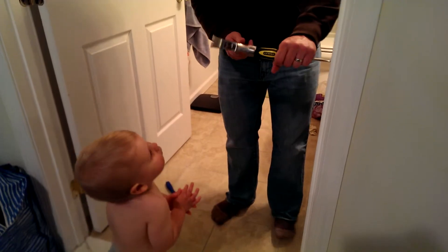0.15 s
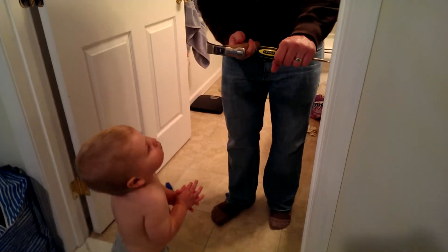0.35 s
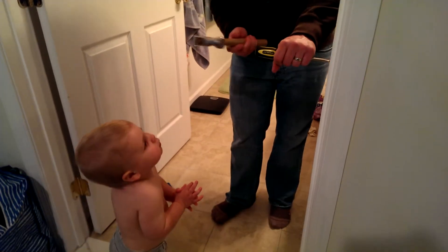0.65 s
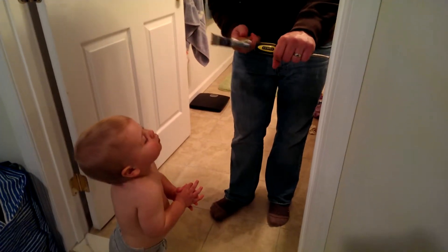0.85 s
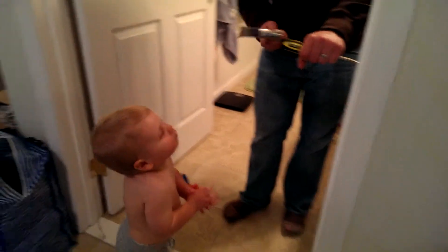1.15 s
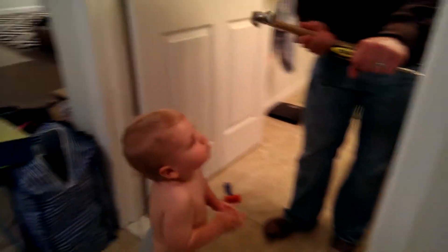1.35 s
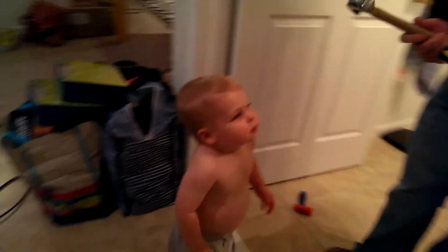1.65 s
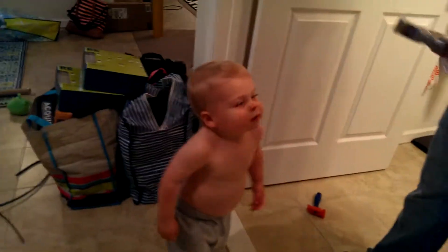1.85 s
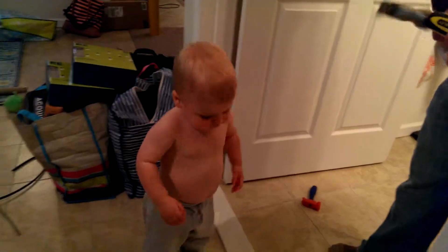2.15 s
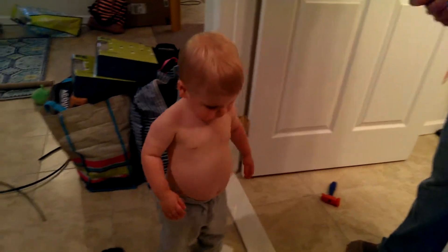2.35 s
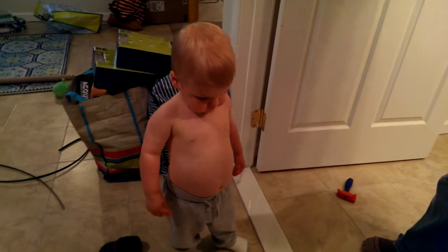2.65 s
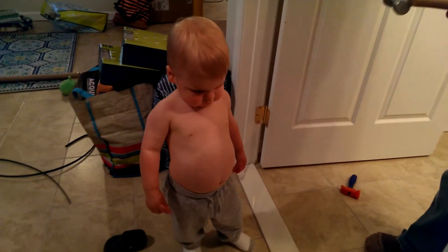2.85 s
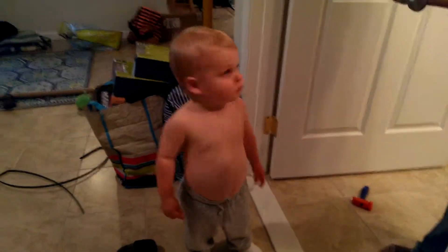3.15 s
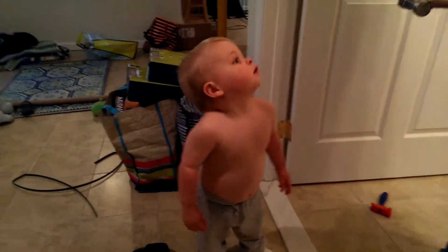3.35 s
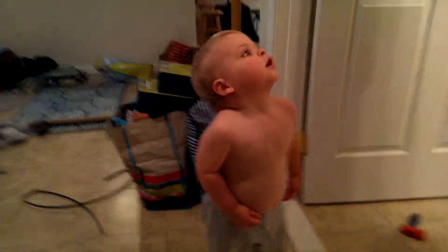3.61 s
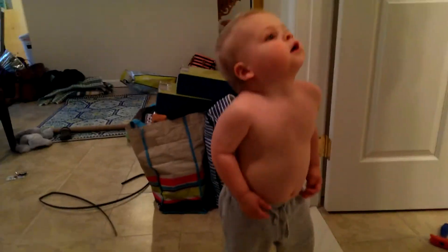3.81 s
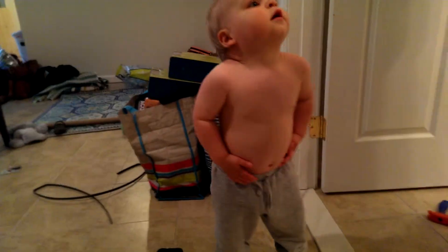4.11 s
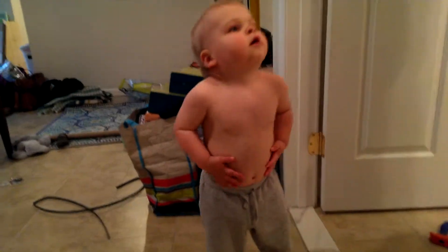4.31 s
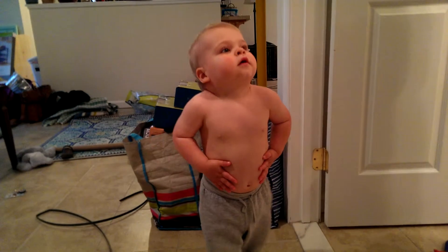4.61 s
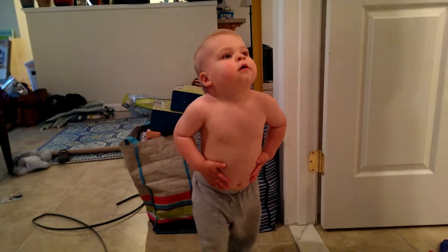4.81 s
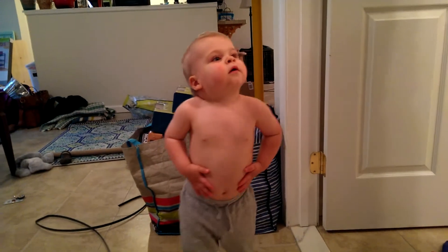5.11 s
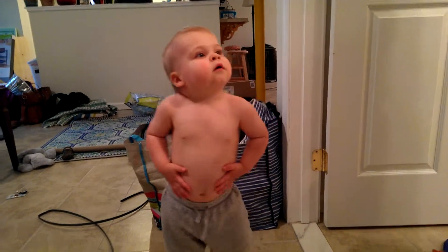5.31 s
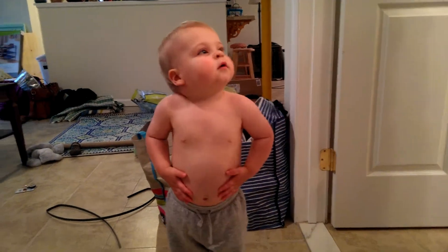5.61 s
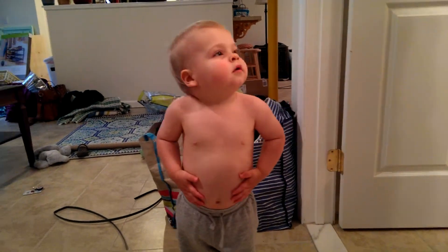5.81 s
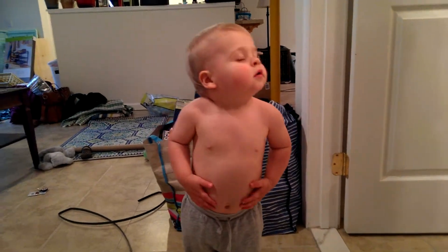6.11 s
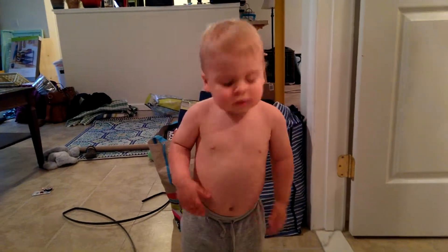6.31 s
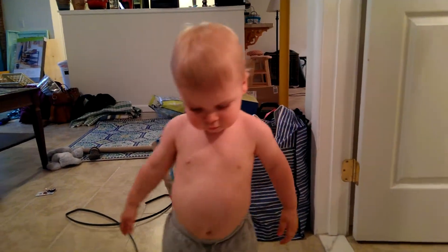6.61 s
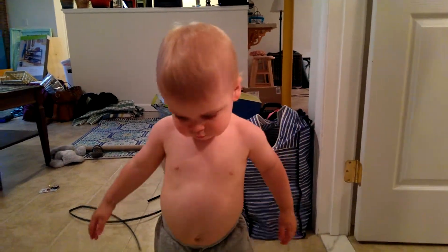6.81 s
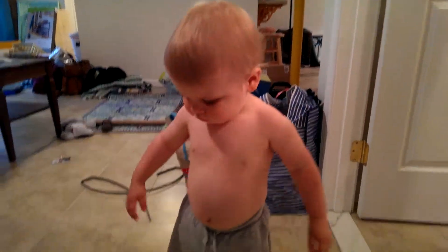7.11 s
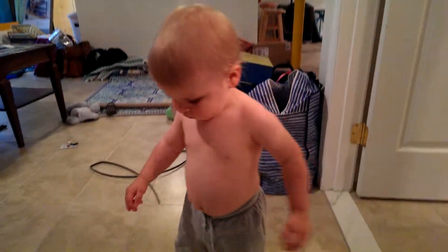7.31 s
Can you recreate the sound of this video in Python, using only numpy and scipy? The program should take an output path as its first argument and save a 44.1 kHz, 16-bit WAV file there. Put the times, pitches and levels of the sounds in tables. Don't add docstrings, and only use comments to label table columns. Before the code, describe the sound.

A hammer drives two runs of seven quick even blows into a wooden door frame, with a quiet pause of rustling cloth between in a bare room.

```python
import sys
import numpy as np
from scipy import signal
from scipy.io import wavfile

SR = 44100
rng = np.random.default_rng(int(sys.argv[2]) if len(sys.argv) > 2 else 0)


def to_linear_factor(level_db):
    exponent = np.asarray(level_db, float) / 20
    return 10 ** exponent


def log_audio(samples):
    frames = np.atleast_2d(samples).T
    limited = np.clip(frames, -1, 1)
    pcm = np.round(limited * 32767).astype(np.int16)
    wavfile.write(sys.argv[1], SR, pcm)


N = 328986
EDGES_HZ = 20 * 2 ** np.arange(0, 9.8, 1 / 3)
RUNS_PART_S = 5.2


def rms_one(x):
    return x / np.sqrt(np.mean(x ** 2) + 1e-20)


def at_hz(points, hz):
    points_hz, values = np.transpose(points)
    return np.interp(np.log(hz), np.log(points_hz), values)


def ring(clicks, hz, t60):
    radius = to_linear_factor(-60 / (t60 * SR))
    angle = 2 * np.pi * hz / SR
    feedback = [1, -2 * radius * np.cos(angle), radius * radius]
    return signal.lfilter([0, np.sin(angle)], feedback, clicks + 1e-18)


def third_octaves(white, gain_of_band, from_hz):
    # f/Hz, left over right/dB
    port_balance = [(60, 6.5), (95, -1.5), (150, 4), (240, -3), (380, -0.5), (600, 0), (950, 0.5),
                    (1500, -1.5), (2380, -2.5), (3770, -11.5), (5980, 2.5), (9470, 37), (15000, 18.5)]
    # f/Hz, correlation/1
    likeness = [(60, -0.34), (150, 0.94), (380, 0.74), (950, 0.28), (2380, -0.28), (5980, 0.14),
                (15000, 0.49)]
    out, edges = 0, EDGES_HZ[EDGES_HZ > from_hz]
    for k, (low, high) in enumerate(zip(edges, edges[1:])):
        hz = np.sqrt(low * high)
        sos = signal.butter(2, [low, high], "band", fs=SR, output="sos")
        mid, side = signal.sosfilt(sos, white[k % 2] * gain_of_band(hz) + 1e-18)
        alike = np.clip(at_hz(likeness, hz), -1, 1)
        port = to_linear_factor(at_hz(port_balance, hz) / 2)
        mid, side = np.sqrt(1 + alike) * mid, np.sqrt(1 - alike) * side
        pair = np.array([(mid + side) * port, (mid - side) / port])
        out = out + pair / np.sqrt(port ** 2 + port ** -2)
    return out


def hits():
    # t/s, peak level/dB, wall boom/dB, hardness (treble over mid)/dB
    hammer_blows = [(0.574, -15.5, -27.5, -30.5), (0.908, -1.5, -17.5, -27.5), (1.2336, -0.5, -13, -22.5),
                    (1.5734, 1.5, -12.5, -23), (1.91, 2, -10.5, -16.5), (2.2464, 2, -15, -12),
                    (2.5846, -5, -10, -6), (5.414, -5.5, -15, -28.5), (5.7457, -0.5, -13.5, -24),
                    (6.0722, 1.5, -10, -21.5), (6.3888, 2.5, -8.5, -18), (6.7215, 3, -11.5, -21),
                    (7.053, 3, -10, -17), (7.385, 4, -8, -19)]
    # t/s, peak level/dB, wall boom/dB, hardness/dB, body over mid/dB
    soft_bumps = [
        (0.198, -38, -43, -31, -16),
        (0.264, -44, -46.5, -36, -3),
        (3.795, -52, -46.5, -18, -5),
        (3.83, -48.5, -58, -8, -23),
        (4.778, -57, -69, -36, 1),
    ]
    first_body_db, second_body_db = -12, -15
    s, peak_db, boom_db, hard_db = np.transpose(hammer_blows)
    longer = 0.93 + 0.022 * np.minimum(hard_db + 20, 0)
    blow_body_db = np.where(s < RUNS_PART_S, first_body_db, second_body_db)
    blows = [s, peak_db, boom_db, hard_db, longer, blow_body_db]
    *bumps, body_db = np.transpose(soft_bumps)
    bumps += [0.57 - 0.015 * (body_db - first_body_db), body_db]
    both = np.hstack([blows, bumps])
    return both[:, np.argsort(both[0])]


def shudder():
    peak_s, rise_s, fall_db_per_s = 0.21, 0.06, 92.5
    s, _, boom_db = hits()[:3]
    late = np.arange(SR) / SR - peak_s
    shape = np.where(late < 0, np.exp(-(late / rise_s) ** 2 / 2), to_linear_factor(-fall_db_per_s * late))
    gain = np.full(N + SR, to_linear_factor(-72.5))
    for i, g in zip((s * SR).astype(int), to_linear_factor(-11 + 1.3 * boom_db)):
        gain[i:i + SR] += g * shape
    return gain[:N]


def house():
    # f/Hz, level/dB
    room_tone = [(12, -31), (20, -2), (49, 2.5), (96, -24.5), (189, -16), (404, -20), (465, -17.5),
                 (506, -28), (772, -16), (939, -18.5), (3940, -20), (7300, -39), (11100, -27.5),
                 (16500, -54.5)]
    # f/Hz, rms level/dB
    appliance_lines = [(241, -87), (475, -91), (752, -89), (791, -88.5)]
    white = rng.standard_normal((2, 2, N))
    tone = to_linear_factor(-68) * rms_one(third_octaves(white, lambda hz: to_linear_factor(at_hz(room_tone, hz)), from_hz=30))
    low_band = signal.butter(2, [34, 100], "band", fs=SR, output="sos")
    low = signal.sosfilt(low_band, white[0, :, ::-1])
    low = rms_one(low[0] + 0.22 * low[1] * [[1], [-1]])
    lines = sum(to_linear_factor(db) * rms_one(ring(white[1, 0, ::-1], hz, 1.0)) for hz, db in appliance_lines)
    return tone + lines + to_linear_factor(-12) * low * shudder()


def steel_snap(level_db=13, edge_hz=3500, right_cut_hz=5000):
    s, peak_db, _, hard_db = hits()[:4]
    clicks = np.zeros(N)
    clicks[(s * SR).astype(int)] = -to_linear_factor(peak_db + hard_db + level_db)
    snap = signal.sosfilt(signal.butter(2, edge_hz, "high", fs=SR, output="sos"), clicks + 1e-18)
    return np.array([snap, signal.sosfilt(signal.butter(2, right_cut_hz, fs=SR, output="sos"), snap)])


def blows_in_room(same=0.4, level_db=10.5, treble_from_hz=1500):
    # f/Hz, density/dB per Hz
    tail_colour = [(59, -29.5), (100, -4), (111, -7.5), (174, -6), (207, -6.5), (384, -5.5), (518, -8.5),
                   (602, -13.5), (699, -10.5), (1990, -11.5), (4120, -16.5), (6730, -37), (11200, -28),
                   (16500, -65)]
    # f/Hz, t60/s
    tail_t60 = [(100, 0.82), (300, 0.68), (1000, 0.7), (3000, 0.7), (6000, 0.74), (12000, 0.47)]
    usual_hardness_db, usual_body_db = -14.5, -9
    s, peak_db, _, hard_db, longer, body_db = hits()
    harder_db = hard_db - usual_hardness_db
    last = np.clip(np.searchsorted(s, np.arange(N) / SR) - 1, 0, None)
    since_blow = np.abs(np.arange(N) - s[last] * SR).astype(int)
    pattern = rng.standard_normal((2, 2, N))[..., since_blow]
    white = np.sqrt(same) * pattern + np.sqrt(1 - same) * rng.standard_normal((2, 2, N))
    starts, age = ((s - 0.0003) * SR).astype(int), np.arange(SR // 2) / SR
    gather = 1 - np.exp(-age / 0.00072)
    early = to_linear_factor(2.0) * np.exp(-age / 0.021)
    tick = to_linear_factor(14) * (1 - np.exp(-age / 0.00019)) * np.exp(-age / 0.00052)
    chatter = to_linear_factor(14) * gather * np.exp(-age / 0.003)
    far = to_linear_factor(-9.5) * np.exp(-((age - 0.065) / 0.031) ** 2 / 2)
    sag = np.exp(-(age / 0.27) ** 2 / 2)

    def bump_at(hz, centre_hz, octaves):
        return np.exp(-(np.log2(hz / centre_hz) / octaves) ** 2)

    def dying(hz):
        t60, gain = at_hz(tail_t60, hz), np.zeros(N + SR)
        treble = np.clip(np.log2(hz / treble_from_hz) / 3.77, 0, 1.2)
        bass = np.clip(np.log2(900 / hz), 0, 1)
        soft = 0.34 * bump_at(hz, 1274, 0.19)
        colour_db = (treble - soft) * harder_db + bass * (body_db - usual_body_db)
        woken = bump_at(hz, np.where(s < RUNS_PART_S, 4018, 2016), 0.17)
        colour_db = colour_db + 0.5 * woken * np.clip(hard_db + 31, 0, 8.0)
        crack = gather * (1 + far + early * to_linear_factor(1.5 * treble))
        contact = (0.12 + treble) * tick + treble ** 5.8 * chatter
        shape = sag ** (1 - 0.5 * treble) * (crack + contact)
        lasting = longer ** np.clip(1 - 0.2 * treble, 0, 1) * to_linear_factor(-0.3 * soft * harder_db)
        heights = to_linear_factor(peak_db + colour_db + at_hz(tail_colour, hz) + level_db)
        for i, g, more in zip(starts, heights, lasting):
            gain[i:i + len(age)] += g * shape * np.exp(-np.log(1000) * age / (t60 * max(more, 0.2)))
        return gain[:N]
    return third_octaves(white, dying, from_hz=60)


def struck_modes(modes, strength_db, contact_hz, spread_db, pan_db):
    at, out = (hits()[0] * SR).astype(int), np.zeros((2, N))
    luck = rng.standard_normal((len(at), len(modes)))
    for k, (hz, level_db, t60) in enumerate(modes):
        clicks = np.zeros(N)
        clicks[at] = to_linear_factor(strength_db + level_db + spread_db * luck[:, k])
        side = pan_db * (-1) ** (k // 2) * np.array([[1], [-1]])
        out += (-1) ** k * ring(clicks, hz, t60) * to_linear_factor(side)
    return signal.sosfilt(signal.butter(2, contact_hz, fs=SR, output="sos"), out)


def wall_boom():
    # f/Hz, level/dB, t60/s
    wall_modes = [(42.43, -15, 0.96), (48.5, -24, 0.69), (55.7, -23, 0.42), (84.9, 1.5, 0.26),
                  (77.23, 4, 0.27), (80.8, -14, 0.61), (124.9, -15.5, 0.39), (179.7, -21, 0.59),
                  (381.3, -19, 0.38), (457, -21.5, 0.23)]
    boom_db = hits()[2]
    wall = struck_modes(wall_modes, boom_db + 9.5, contact_hz=517, spread_db=2.5, pan_db=0.17)
    return np.pad(wall, ((0, 0), (130, 0)))[:, :N]


def frame_ring():
    # f/Hz, level/dB, t60/s
    frame_modes = [(587, -19.5, 0.18), (712, -22, 0.12), (963, -20, 0.077), (1156, -16, 0.16),
                   (1290, -18.5, 0.27), (1385, -21.5, 0.31), (1564, -26, 0.18), (1670, -20.5, 0.2),
                   (1967, -20, 0.11), (2300, -21, 0.24)]
    # f/Hz, level/dB, t60/s
    soft_modes = [(1246, -19, .3), (1310, -20, 0.46), (1356, -17.5, 0.55), (1413, -18, .35),
                  (1490, -19.5, .3), (1570, -21, .25)]
    _, peak_db, _, hard_db = hits()[:4]
    frame = struck_modes(frame_modes, peak_db + 3, contact_hz=4000, spread_db=3.0, pan_db=2.5)
    softer_db = 0.45 * (hard_db.min() - hard_db) - 20 * (peak_db < -30)
    soft_db = peak_db + softer_db + 4.0
    return frame + struck_modes(soft_modes, soft_db, contact_hz=4000, spread_db=2.0, pan_db=2.0)


def rubbing():
    # peak t/s, peak level/dB, rise/s, fall/s
    rubs = [(0.28, -75, 0.058, 0.095), (0.415, -71, 0.023, .03), (1.12, -68.5, .015, .025),
            (1.186, -58.5, 0.017, 0.02343), (2.97, -71.5, .01, 0.069), (3.16, -67.5, 0.0081, 0.066),
            (3.41, -69.5, .006, .09), (3.488, -67, 0.0065, 0.011), (3.601, -70.5, .05, 0.19),
            (3.686, -67.5, .006, .02), (3.816, -66.5, 0.011, 0.024), (3.86, -69.5, 0.083, 0.17),
            (4.888, -78, 0.036, .06)]
    t, gain = np.arange(N) / SR, 0
    for s, db, rise_s, fall_s in rubs:
        gain = gain + to_linear_factor(db) * np.exp(-((t - s) / np.where(t > s, fall_s, rise_s)) ** 2 / 2)
    return gain


def rustle(grains_per_s=9000, size_db=1.0, level_db=5):
    # f/Hz, density/dB per Hz
    cloth_colour = [(240, -40), (400, -7), (481, -6.5), (1510, -7), (1710, -6), (3930, -1), (5520, -8),
                    (6950, -15.5), (11400, -5.5), (16000, -16.5)]
    shape = (2, N)
    caught = rng.random(shape) < grains_per_s / SR
    grains = caught * to_linear_factor(size_db * rng.exponential(1, shape)) * rng.standard_normal(shape)
    swish = third_octaves([grains, grains[:, ::-1]], lambda hz: to_linear_factor(at_hz(cloth_colour, hz)), from_hz=300)
    return to_linear_factor(level_db) * rms_one(swish) * rubbing()


def door_panel():
    # f/Hz, level/dB, t60/s
    panel_modes = [(261.3, -27, 1.4)]
    s, _, boom_db = hits()[:3]
    strength_db = boom_db + 8 - 40 * (s < 5.6)
    return struck_modes(panel_modes, strength_db, contact_hz=503, spread_db=-4.0, pan_db=-0.5)


def scene():
    left_lag = 8
    left, right = wall_boom() + door_panel() + frame_ring()
    wood = np.array([np.pad(left, (left_lag, 0))[:N], right])
    return house() + steel_snap() + blows_in_room() + wood + rustle()


def low_pass(x):
    return signal.sosfilt(signal.butter(12, 16740, fs=SR, output="sos"), x)


def record(dry):
    level_db = 20 * np.log10(np.abs(dry).max(axis=0) + 1e-9)
    slope = 150 * np.arange(N) / SR
    held_db = np.maximum.accumulate(level_db + slope) - slope
    cut_db = -0.4 * np.clip(held_db + 8.5, 0, None)
    smooth = np.exp(-1 / (0.0027 * SR))
    gain_db = 1.5 + signal.lfilter([1 - smooth], [1, -smooth], cut_db)
    ports = signal.sosfilt(signal.butter(2, 33, "high", fs=SR, output="sos"), dry)
    ports = ports - 0.42 * signal.lfilter(*signal.iirpeak(6717, 6717 / 860, SR), ports)
    ports = ports + 0.72 * signal.lfilter(*signal.iirpeak(11460, 11460 / 1200, SR), ports)
    rounded = 0.88 * np.tanh(ports * to_linear_factor(gain_db) / 0.86)
    top_cut = signal.cheby2(8, 14, 16500, fs=SR, output="sos")
    return low_pass(signal.sosfilt(top_cut, rounded))


dry = scene()
out = record(dry)
log_audio(out)
```